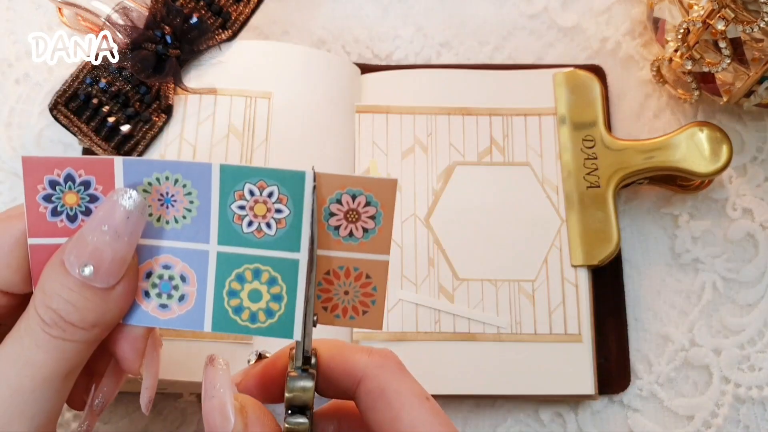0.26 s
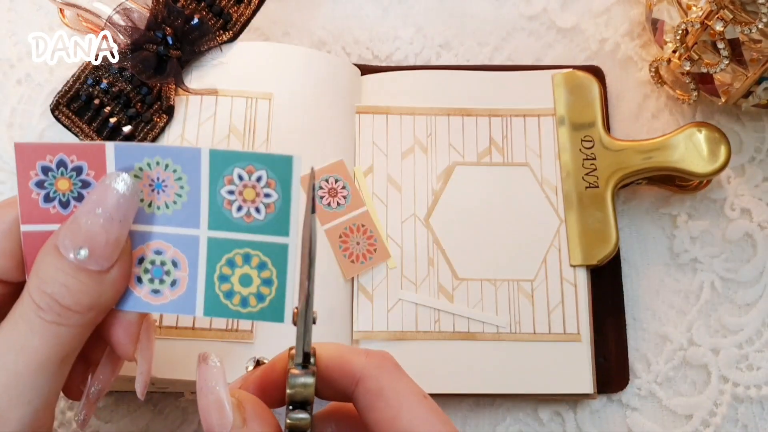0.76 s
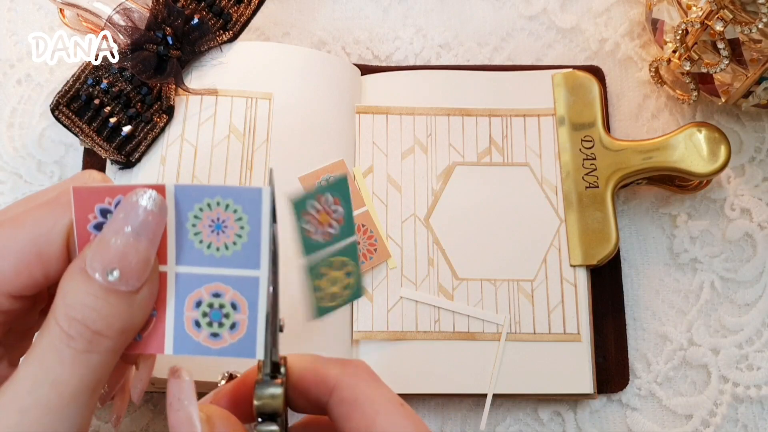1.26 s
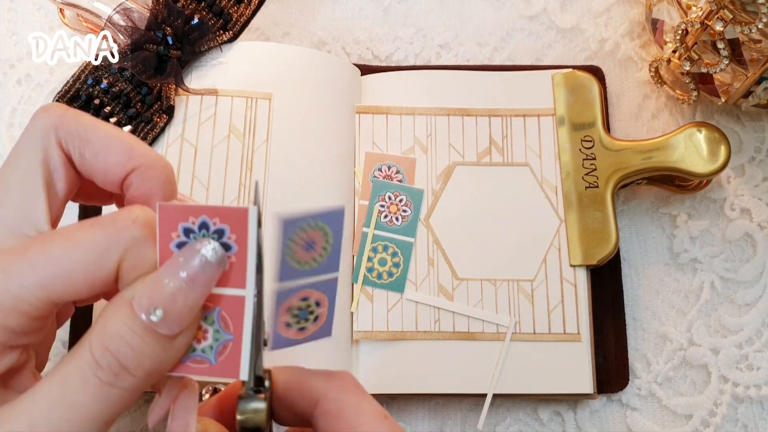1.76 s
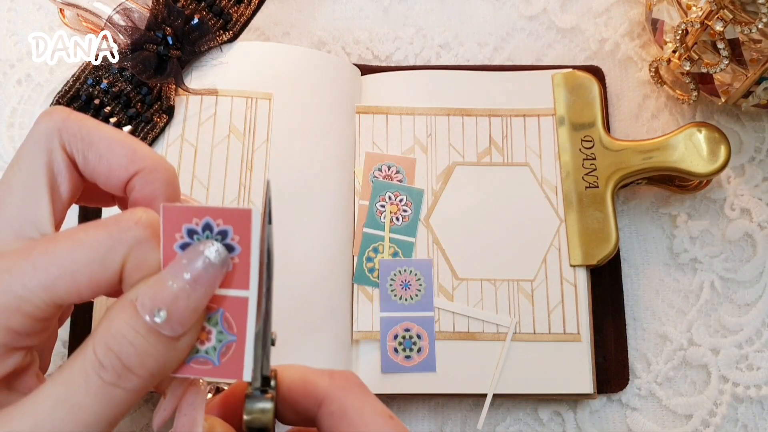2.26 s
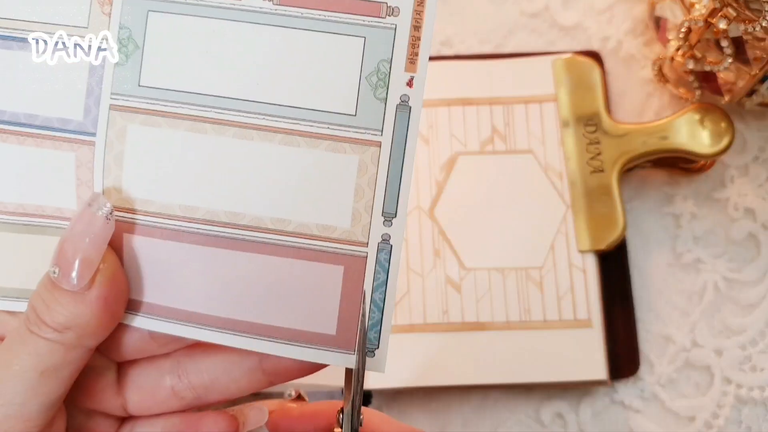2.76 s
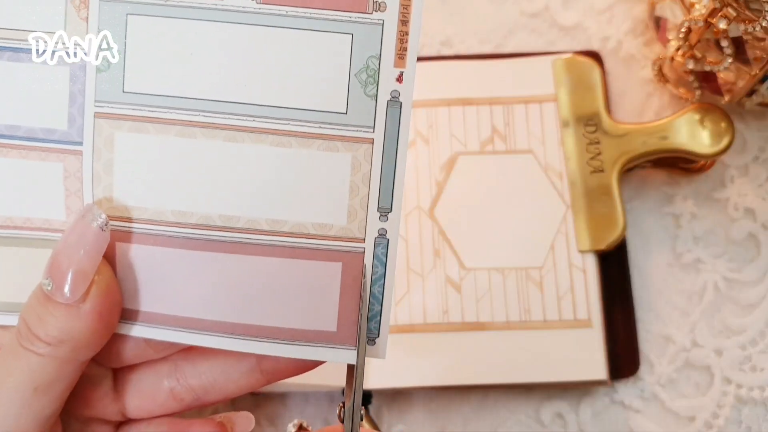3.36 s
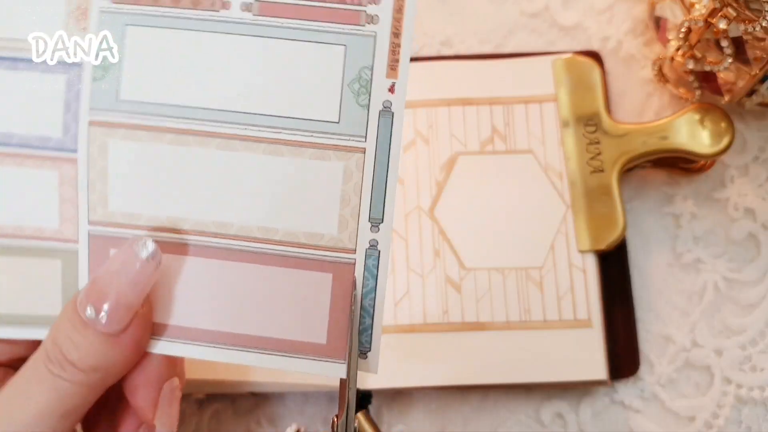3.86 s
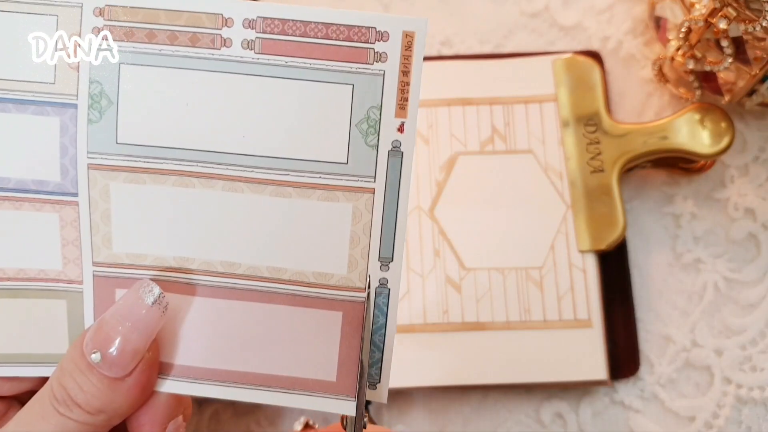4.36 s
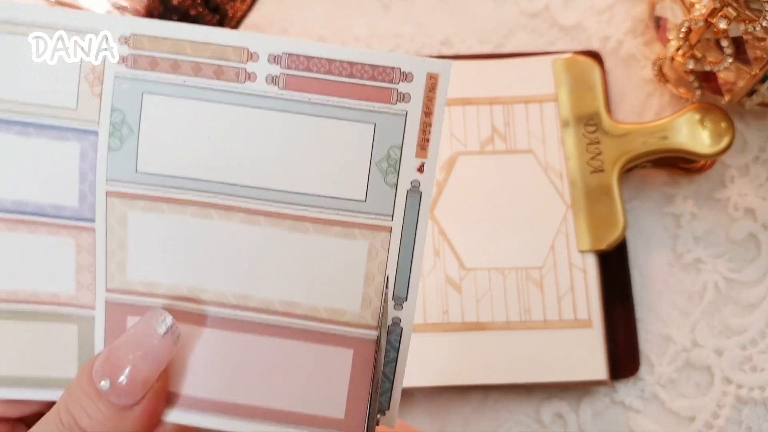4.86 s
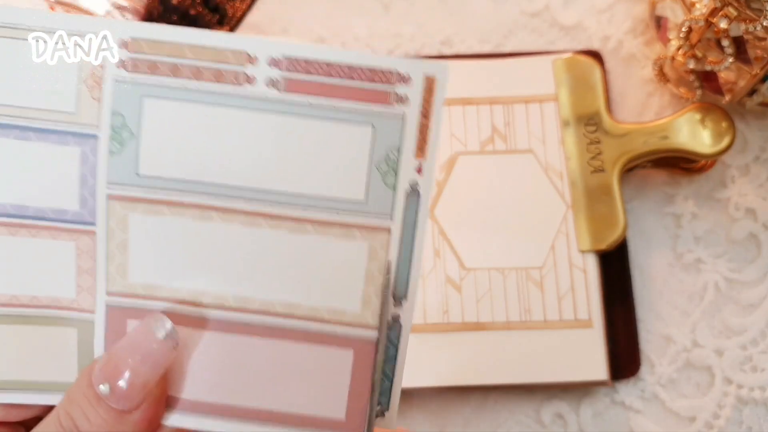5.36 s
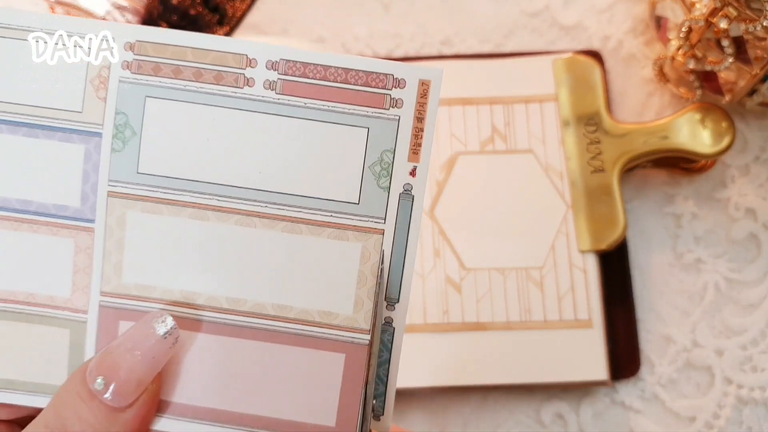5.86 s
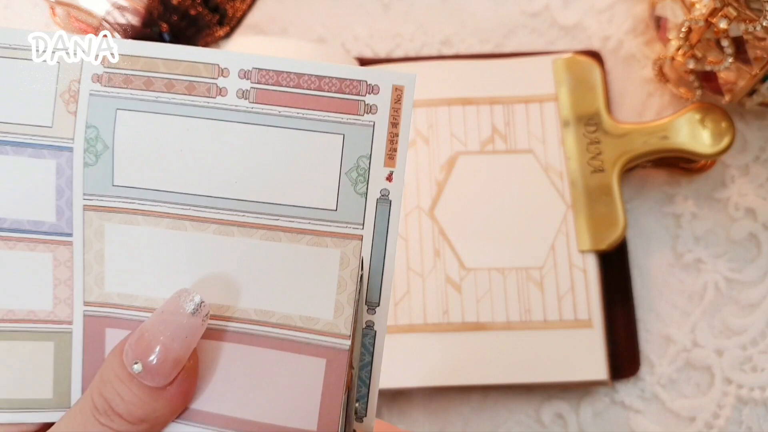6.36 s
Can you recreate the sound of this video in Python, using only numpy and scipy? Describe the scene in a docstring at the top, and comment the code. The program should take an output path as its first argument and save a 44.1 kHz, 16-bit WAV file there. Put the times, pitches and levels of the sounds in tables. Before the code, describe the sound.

A quiet indoor desk, microphones near the hands. Paper rustles faintly over a low handling rumble, then scissor blades snap through small stiff pieces in four busy groups, the page beneath answering with short hollow taps. A larger sheet follows: gentle scraping slides, slight swishes and isolated faint clicks, slightly to the left. Finally a few soft low knocks and paper ticks, with barely any room tail.

```python
"""A low rumble of hands on a desk and a soft rustle of paper open the scene; then small scissors cut sticker paper
over an open notebook, close to a spaced pair of microphones. Blades tick and snip as short noise cracks, and the page
answers with hollow modes. Blade and fingers slide on the sheet as shaped random grains with tiny snaps,
a rubbed sheet sings faintly, and knocks ring the desk. A short room tail and a faint hiss lie below."""
import sys
import numpy as np
from scipy import signal
from scipy.fft import rfft, irfft, next_fast_len
from scipy.io import wavfile
from scipy.ndimage import uniform_filter1d

SR = 44100
rng = np.random.default_rng(int(sys.argv[2]) if len(sys.argv) > 2 else 0)


def materialize(psi):
    """Save the field psi as 16-bit PCM at rate SR to the path in sys.argv[1].

    A 1-D psi becomes a single channel; in a 2-D psi each row is a channel.
    """
    bounded = np.clip(np.atleast_2d(psi).T, -1, 1)
    quanta = np.round(bounded * 32767).astype(np.int16)
    wavfile.write(sys.argv[1], SR, quanta)


N = 291060      # samples, 6.6 s
RIGHT_LAG_S = .00012      # shared sound reaches the right microphone this much later


# Ticks of blades and paper. Each row: start in seconds, hollow page level in dB, snap level in dB,
# snap frequency in Hz (it sets the snap's band), blade edge level in dB, t60 of the crack in seconds,
# left-right difference in dB, lag of the right side in microseconds.
TICKS = [(0.3604, -61.0, -43, 5500.0, -37, 0.018, 3, -110.0),
         (0.424, -48, -55, 3100.0, -44, 0.023, -2, 50.0), (0.5036, -49, -44, 4300.0, -42, 0.011, -1, 92),
         (0.6371, -42, -30.5, 3640, -54, 0.017, 10.5, 181),
         (0.6415, -58, -24.5, 3820, -20.5, 0.014, 4.5, 142), (0.751, -15, -21, 3020, -42, 0.012, -1, -30),
         (0.7651, -46.0, -33.5, 5030, -24.5, 0.022, -2, 20.0),
         (0.7954, -30, -36, 2300.0, -48, 0.026, 1, 110.0),
         (0.8132, -37, -20, 3130, -24.5, 0.015, -6, 110.0), (0.8276, -39, -33, 3600.0, -55, 0.012, 2, 69.5),
         (0.933, -56, -41, 3800.0, -37, 0.0038, -2, 0.0), (0.9377, -46, -38.5, 4400, -31.5, 0.012, -1, 26),
         (1.0, -61.0, -51, 5500.0, -32.5, 0.013, -1.0, -270.0),
         (1.3782, -50, -41, 3400.0, -51, 0.022, 7, 160.0),
         (1.3877, -47, -24, 5430, -13.5, 0.014, 8.5, 140.0),
         (1.4749, -47, -43, 3600.0, -37.5, 0.021, 0, 20.0),
         (1.4945, -31, -13.5, 4100, -27, 0.016, -3, 70.0), (1.503, -44, -38.5, 4380, -61, 0.071, 0, 17),
         (1.5101, -51, -34, 2500.0, -33.5, 0.024, 7, 90.0),
         (1.5509, -47.0, -38, 4370, -30.5, 0.038, 0.0, 20.0),
         (1.5614, -55, -35.5, 3200.0, -42, 0.027, -3, 70.0), (1.6241, -64, -44, 5470, -32.5, 0.016, 2, 0.0),
         (1.6465, -44, -44, 3300.0, -61, 0.014, -2.0, 20.0), (1.72, -61, -42, 3270, -46, 0.02, -3, 70.0),
         (1.7687, -66, -58, 4300.0, -40, 0.0051, -4, 9), (1.889, -25, -13.5, 4630, -47, 0.0086, 2, 180.0),
         (1.8952, -27, -19.5, 4460, -22, 0.022, 13.5, 180.0),
         (1.8984, -35, -23.5, 4870, -18.5, 0.0074, 6, 170),
         (1.9007, -36, -18, 4700, -44, 0.021, 5.5, 160.0),
         (2.0027, -57, -30.5, 4860, -27.5, 0.0097, 12, -70.0),
         (2.0102, -53.0, -33, 5000.0, -42, 0.041, -1, 90.0),
         (2.0223, -24, -24.5, 3000, -50, 0.032, 0.5, 70.0),
         (2.0755, -49, -42, 3500.0, -38.5, 0.027, -1, 20.0), (2.33, -25, -31, 3630, -29, 0.027, 4.5, 0.0),
         (2.5957, -63, -65, 5440, -31.5, 0.0098, 3, 0.0), (2.879, -50.5, -46, 4240, -38, 0.018, 1, 0.0),
         (3.0709, -46.5, -42, 3800.0, -42.5, 0.016, 10, 70.0),
         (3.3918, -49, -42.5, 2800.0, -46, 0.016, 3, 100), (3.634, -53, -31, 5830, -20.5, 0.0081, 2, 0.0),
         (3.8829, -64, -47.5, 4400.0, -46, 0.007, -8, 20.0), (4.2194, -49, -53, 4400, -34, 0.0089, 0.0, 21),
         (4.263, -60, -51.5, 4300, -43, 0.012, 1, 0.0), (4.527, -53, -55, 4700.0, -41, 0.016, 2, -250.0),
         (4.8251, -65.0, -54, 4300.0, -40, 0.013, 0, -110.0), (4.892, -73, -49, 4030, -35, 0.011, -3, -20),
         (5.4927, -78, -66, 5170, -41.5, 0.0087, 2, 0.0), (5.5583, -33.5, -40, 2700.0, -40, 0.012, 6, 159),
         (5.6797, -65, -56, 4600.0, -45, 0.008, 1.0, -23.5),
         (6.076, -46, -54, 2400.0, -62, 0.018, 11, 234.5), (6.4553, -42.5, -42, 2500, -59, 0.032, 2, 150),
         (6.489, -49, -49, 4600.0, -33, 0.016, 1, 70.0), (6.5169, -42.5, -41, 2480, -50, 0.025, 4.5, 160.0),
         (6.5653, -47, -37.5, 2780, -48, 0.03, 6.5, 140.0), (6.5755, -46, -47, 4400, -37, 0.011, 0, 178.5)]
# Hollow modes of the page. Each row: frequency in Hz, relative level in dB, t60 in seconds when free to ring.
PAGE_MODES = [(610, -22, 0.078), (769, -2, 0.038), (1023, 11.5, 0.013), (1400, -13, 0.021),
              (1580, -5, 0.035)]


def ticks():
    """A sharp break with a ragged tail: blade edge in the treble, snap in the middle, hollow modes from the page."""
    out = np.zeros((2, N))
    t = np.arange(3072) / SR
    noise = rng.standard_normal((len(TICKS), len(t)))
    spread_db = rng.normal(0, 0.71, (len(TICKS), len(PAGE_MODES)))      # no two blows excite the modes alike
    treble = signal.butter(1, [7500, 13500], "band", fs=SR, output="sos")
    for row, white, mode_db in zip(TICKS, noise, spread_db):
        s, page_db, snap_db, hz, edge_db, t60, pan_db, lag_us = row
        crack = white * from_db(-60 * t / max(t60, .002)) * np.minimum(t / 0.00066, 1)
        crack[24] += 4.0      # the moment of the break

        push = 0.12 * crack + np.exp(-((t - .0006) / .0001) ** 2)      # the page is struck once, softly
        free = np.clip(0.04 + (page_db - edge_db) / 25, .3, 1)      # a dull, flat blow leaves the page free to ring
        page = sum(from_db(db + more_db) * ring(push, mode_hz, free * decay_s)
                   for (mode_hz, db, decay_s), more_db in zip(PAGE_MODES, mode_db))

        snap_band = signal.butter(1, [hz / 1.17, hz * 1.96], "band", fs=SR, output="sos")
        snap_top = signal.butter(2, hz * 1.43, "low", fs=SR, output="sos")
        snap = signal.sosfilt(np.vstack([snap_band, snap_top]), crack)
        edge = signal.sosfilt(treble, crack)

        sound = -from_db(page_db) * peak_one(page)
        sound += from_db(snap_db) * peak_one(snap)
        sound += from_db(edge_db) * peak_one(edge)
        place(out, s, sound, pan_db, np.clip(lag_us, -300, 300) * 1e-6)
    return signal.sosfilt(signal.butter(2, 200, "high", fs=SR, output="sos"), out)


# Strokes on the sheet. Each row: start of hold, attack, hold and release in seconds,
# then sliding, shearing and sheet flex level in dB.
STROKES = [(.2, 0.24, 0.09, 0.43, -62, -62.5, -69), (.647, 0.1, 0.0037, 0.14, -53.5, -52, -58.5),
           (.752, 0.0053, 0.018, 0.23, -50, -57, -48.5), (.82, 0.083, .005, 0.14, -56.5, -55, -58),
           (.936, 0.046, 0.0054, 0.038, -54.5, -53, -70), (1.39, 0.055, .004, 0.096, -51.5, -49.5, -58.5),
           (1.505, 0.03, 0.0033, 0.13, -47.5, -48, -49), (1.59, .1, .01, .2, -58, -58, -63),
           (1.72, 0.096, .004, 0.13, -55.5, -54.5, -76), (1.85, 0.042, 0.026, .05, -51, -49, -53.5),
           (1.893, .06, .006, 0.057, -44, -41.5, -50), (1.94, .1, 0.025, 0.055, -59, -58, -56),
           (2.018, 0.023, 0.0034, 0.032, -41, -39.5, -48.5), (2.06, .02, 0.011, 0.12, -62, -58.5, -57),
           (2.342, 0.076, .004, 0.096, -59, -57, -62), (2.61, 0.16, .01, 0.15, -68, -65, -64),
           (2.96, 0.079, 0.51, 0.11, -56.5, -63.5, -71.5), (3.2, 0.44, 0.067, 0.14, -55, -65, -77),
           (3.65, .15, 0.076, 0.12, -67, -63, -61.5), (3.89, 0.085, 0.012, .08, -62.5, -58, -79),
           (4.07, .03, .04, .1, -51.5, -52, -55.5), (4.108, 0.069, .004, 0.051, -54, -50.5, -57),
           (4.52, .1, 0.078, 0.1, -61.5, -61, -70), (4.75, 0.092, 0.053, 0.039, -57.5, -56, -70),
           (4.869, 0.023, .002, 0.098, -66.5, -68, -68), (4.926, 0.011, 0.034, 0.11, -50, -49.5, -57),
           (5.255, .07, 0.15, 0.063, -62.5, -60, -74), (5.533, 0.022, 0.019, 0.041, -49.5, -50.5, -48),
           (5.57, .02, .004, .06, -59, -63, -51), (5.935, .04, 0.092, .1, -77, -70, -84),
           (6.098, 0.063, .004, 0.16, -58.5, -62.5, -60)]
# The held sheet rustles faintly throughout. Each row: time in seconds, sliding level in dB.
RUSTLE = [(0, -61.5), (.5, -63), (.74, -64.5), (.97, -63.5), (1.3, -64.5), (1.8, -65), (2.2, -66),
          (2.5, -67.5), (3.55, -67), (4, -69), (4.3, -67.5), (4.7, -72.5), (5.15, -74), (5.9, -75),
          (6.05, -78.5), (6.25, -66.5), (6.4, -64.5), (6.6, -62)]
# How shearing (first row) and flex (second) follow the rustle.
# Each row: level in dB when the rustle is at USUAL_DB, slope in dB per dB of rustle.
FOLLOW = [(-68, 1.5), (-65.5, 1.25)]
USUAL_DB = -67


def sheet_levels():
    """Sliding, shearing and flex in dB over time: the powers of rustle and strokes add."""
    rustle_db, = in_time(RUSTLE)
    steady_db = [rustle_db]
    for db, slope in FOLLOW:
        steady_db.append(db + slope * (rustle_db - USUAL_DB))
    return 10 * np.log10(from_db(steady_db) ** 2 + from_db(swells(STROKES)) ** 2)


# Grainy hiss of sliding. Each row: frequency in Hz, density in dB per Hz.
SLIDE_SPECTRUM = [(1300, -23.5), (1800, -11.5), (2050, -5), (2400, -3.5), (2900, -2.5), (4500, -6.5),
                  (6000, -16.5), (8000, -26.5)]
# Bright hiss of shearing. Each row: frequency in Hz, density in dB per Hz.
SHEAR_SPECTRUM = [(3500, -26), (5500, -6), (6600, -3.5), (7600, -5), (9000, -2), (12000, -4.5), (16500, -5)]


def sliding_and_shearing(smooth, slide_db, shear_db):
    """Fibre grains and tiny snaps feed two spectra, one for sliding and a brighter one for shearing."""
    # In the slide the snaps rise only 0.6 dB per dB of stroke.
    snaps = 0.37 * from_db((-55 - slide_db) * 0.4) * crackle(70)
    fibres = smooth + pair(snaps * np.array([[1], [0], [0]]), 1)      # snaps are wholly shared by the microphones
    slide = from_db(slide_db) * colour(fibres, SLIDE_SPECTRUM)
    shear = from_db(shear_db) * colour(fibres, SHEAR_SPECTRUM)
    return slide + shear


# Duller crumple of the flexing sheet. Each row: frequency in Hz, density in dB per Hz.
FLEX_SPECTRUM = [(200, -25), (350, -2), (600, -2), (1000, -8), (1500, -11), (2200, -14.5)]


def flexing(flex_db):
    """The bending sheet creases in sparser, more uneven grains than it slides."""
    creases = pair(np.array([grains(1500, 3.67, 2.76) for k in range(3)]), 0.38)
    return from_db(flex_db) * colour(creases, FLEX_SPECTRUM)


# The slack sheet's lower swish, until drawn tight. Each row: time in seconds, level in dB.
SLACK = [(2.9, -78), (2.96, -64.5), (3.13, -61), (3.25, -83)]


def slack_swish(smooth):
    """The fibre grains excite one broad, short resonance of the slack sheet."""
    level_db, = in_time(SLACK)
    return from_db(level_db) * rms_one(ring(smooth, 1800, 0.0043))


# A thumb rubs the taut sheet. Each row: start of hold, attack, hold and release in seconds, level in dB.
RUBS = [(4.76, .055, .002, 0.099, -77), (4.94, 0.024, .002, 0.12, -57.5), (5.26, 0.053, .002, 0.077, -67),
        (5.94, 0.056, 0.085, .12, -69.5), (6.07, .04, 0.14, 0.18, -78)]
# Modes of the taut sheet. Each row: frequency in Hz, relative level in dB, t60 in seconds.
SHEET_MODES = [(2450, 0, .006), (6600, -2, .003), (8800, -6, .002)]


def rubs(smooth):
    """The fibre grains set the taut sheet's modes singing faintly."""
    level_db, = swells(RUBS)
    # dividing by the root of t60 keeps a longer ring from gaining power
    song = sum(from_db(db) * ring(smooth, hz, t60) / np.sqrt(t60) for hz, db, t60 in SHEET_MODES)
    return from_db(level_db) * rms_one(song)


# Rumble of the desk. Each row: frequency in Hz, density in dB per Hz.
RUMBLE_SPECTRUM = [(15, -35), (25, -29.5), (79, -3), (97, -1.5), (213, -6), (295, -13.5), (425, -17),
                   (500, -23), (650, -57.5), (1100, -120)]
# The hands' bustle on the desk. Each row: time in seconds, rumble level in dB.
BUSTLE = [(0, -46.5), (.25, -51), (.76, -53.5), (.95, -52.5), (1.32, -53), (1.8, -49), (1.86, -54),
          (2.02, -55), (2.06, -51.5), (2.76, -53), (3.25, -55.5), (4.05, -57.5), (4.9, -61), (4.93, -52),
          (5.07, -63), (5.4, -69), (5.65, -69.5), (6.05, -72), (6.1, -48), (6.2, -64.5), (6.25, -54.5),
          (6.38, -56), (6.6, -49.5)]


def desk_rumble():
    """Low noise that comes and goes in lumps as the hands move on the desk."""
    level_db, = in_time(BUSTLE)
    lumps = pair(rng.standard_normal((3, N)), 0.77) * from_db(2.12 * drift(11.2))
    return from_db(level_db) * colour(lumps, RUMBLE_SPECTRUM)


# Position of the hands. Each row: time in seconds, left-right difference in dB.
HANDS_PAN = [(0, 1), (2.5, 1), (3.2, 4), (3.7, 1), (4.1, 3), (5.2, 4.5), (5.6, 3.5), (6.6, 3.5)]


def hands():
    """Slide, swish and song share one set of fibre grains; flex and desk rumble join them in the stereo pair."""
    slide_db, shear_db, flex_db = sheet_levels()
    pan_db, = in_time(HANDS_PAN)
    smooth = pair(np.array([grains(8000, 1.9, 2.96) for k in range(3)]), 0.13)
    sheet = sliding_and_shearing(smooth, slide_db, shear_db) + flexing(flex_db)
    sheet += slack_swish(smooth) + rubs(smooth)
    return (sheet + desk_rumble()) * from_db([pan_db / 2, -pan_db / 2])


# Knocks of the hand on the desk. Each row: start in seconds, peak level in dB before stereo placement,
# pitch in Hz, t60 in seconds, contact time in seconds.
KNOCKS = [(5.559, -30.5, 220, .04, 0.000037), (5.582, -45.5, 220, 0.023, 0.00039),
          (6.078, -42.5, 116, 0.18, .001), (6.124, -34, 136, 0.062, 0.00098), (6.15, -44.5, 55, 0.21, .003),
          (6.457, -37, 210, 0.021, 0.00017), (6.567, -47, 180, 0.027, 0.00037)]


def knocks():
    """A soft push rings the desk at a low pitch."""
    out = np.zeros((2, N))
    t = np.arange(8192) / SR
    for s, db, hz, t60, contact_s in KNOCKS:
        thud = ring(t * np.exp(-t / contact_s), hz, t60)
        thud = np.gradient(thud)      # the microphones hear the change of the motion
        place(out, s, -from_db(db) * thud / np.abs(thud).max(), 5.0, RIGHT_LAG_S)
    return out


ROOM_DB, ROOM_T60_S = -19, 0.12      # energy of the tail against the dry sound, decay time


def room(x):
    """Nearby surfaces return a short dull noise tail, a different one at each microphone."""
    t = np.arange(SR // 4) / SR
    tail = rng.standard_normal((2, len(t))) * from_db(-60 * t / ROOM_T60_S) * (t > .002)
    tail = signal.lfilter([.6], [1, -.4], tail)
    tail = tail / np.sqrt(np.sum(tail ** 2, axis=1, keepdims=True))
    return from_db(ROOM_DB) * signal.fftconvolve(x, tail, axes=1)[:, :N]


def from_db(db):
    """Gain of a level in dB."""
    return 10 ** (np.asarray(db) / 20)


def rms_one(x):
    """Scale to rms 1."""
    return x / np.sqrt(np.mean(x ** 2) + 1e-20)


def peak_one(x):
    """Scale the top of the short-time envelope to 1."""
    return x / np.sqrt(2 * uniform_filter1d(x ** 2, size=33).max())


def drift(rate_hz):
    """Slow random wander of rms 1: low-passed noise made at every 40th sample, then interpolated."""
    r = np.exp(-2 * np.pi * rate_hz * 40 / SR)
    white = rng.standard_normal(N // 40 + 2002)
    slow = signal.lfilter([1], [1, -2 * r, r * r], white)[2000:]      # drop the filter's start
    return np.interp(np.arange(N) / 40, np.arange(len(slow)), rms_one(slow))


def ring(x, hz, t60):
    """Resonator: a unit click sets a decaying sine of height 1 ringing."""
    r = from_db(-60 / (t60 * SR))
    w = 2 * np.pi * hz / SR
    return signal.lfilter([0, np.sin(w)], [1, -2 * r * np.cos(w), r * r], x)


def colour(x, spectrum):
    """Shape by a spectrum, straight in dB over log frequency; rms 1."""
    hz, db = np.transpose(spectrum)
    size = next_fast_len(N)
    f = np.maximum(np.arange(size // 2 + 1) * SR / size, 1)
    gain = from_db(np.interp(np.log(f), np.log(hz), db, left=-60, right=-60))
    return rms_one(irfft(rfft(x, size) * gain, size)[..., :N])


def grains(per_s, spread_db, clump_db):
    """Fibres catch at random, with very uneven sizes that swell in clumps."""
    born = rng.random(N) < per_s / SR
    sizes_db = spread_db * np.minimum(rng.exponential(1, N), 4) + clump_db * drift(38)
    return rms_one(born * from_db(sizes_db) * rng.choice([-1, 1], N))


def crackle(per_s):
    """Sparse tiny snaps of the bent sheet, each a decaying noise burst of a millisecond or two."""
    snaps = grains(per_s, 4.5, 3.0)
    bursts = signal.lfilter([1], [1, -.97], np.abs(snaps))
    return rms_one(bursts * rng.standard_normal(N))


def pair(x, alike):
    """Two microphones: a shared part that reaches the right one later, and a scattered part of each one's own."""
    late = np.interp(np.arange(N) - RIGHT_LAG_S * SR, np.arange(N), x[0])
    alike = np.clip(alike, 0, 1)
    return np.sqrt(alike) * np.array([x[0], late]) + np.sqrt(1 - alike) * x[1:]


def place(out, s, sound, pan_db, lag_s):
    """Place a short sound in the stereo pair by level difference and right-side lag."""
    for side, late_s, db in ((0, 0, pan_db / 2), (1, lag_s, -pan_db / 2)):
        i = round((s + late_s) * SR)
        out[side, i:i + len(sound)] += from_db(db) * sound[:N - i]


def in_time(rows):
    """Each column after the time as a curve over all samples."""
    s, *columns = np.transpose(rows)
    return [np.interp(np.arange(N) / SR, s, c) for c in columns]


FADE_DB = 20      # attack and release each span this much


def swells(rows):
    """Each stroke swells, holds and fades; powers add; one dB curve per level column."""
    t = np.arange(N) / SR
    power = 1e-12
    for s, attack, hold, release, *db in rows:
        away = np.maximum(s - t, 0) / attack + np.maximum(t - s - hold, 0) / release
        shape = from_db(-FADE_DB * np.minimum(away, 5))
        power = power + from_db(db)[:, None] ** 2 * shape ** 2
    return 10 * np.log10(power)


def scene():
    """All sources at the microphones; the room answers the ticks and knocks."""
    hits = ticks() + knocks()
    return hits + room(hits) + hands()


# Hiss of the microphones. Each row: frequency in Hz, density in dB per Hz.
HISS_SPECTRUM = [(200, -10.5), (1000, -5), (2500, -14), (6000, -18.5), (12000, -6.5), (16400, -6)]
HISS_DB, CUTOFF_HZ = -76, 16700      # hiss rms before the cut, edge of the steep low-pass


def record(dry):
    """Each microphone adds its hiss; the top is cut."""
    hiss = from_db(HISS_DB) * colour(rng.standard_normal((2, N)), HISS_SPECTRUM)
    low_pass = signal.cheby2(12, 70, CUTOFF_HZ, fs=SR, output="sos")
    return signal.sosfilt(low_pass, dry + hiss)


dry = scene()
out = record(dry)
materialize(out)
```